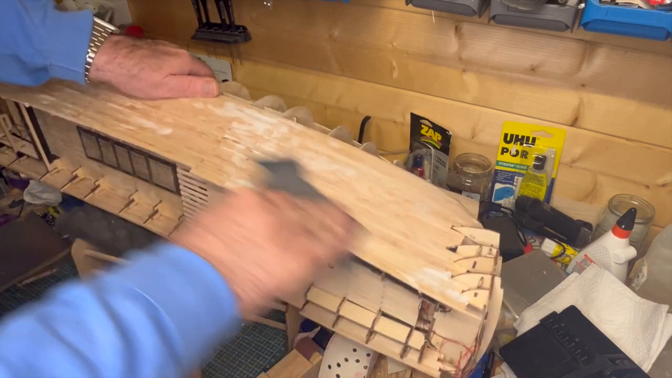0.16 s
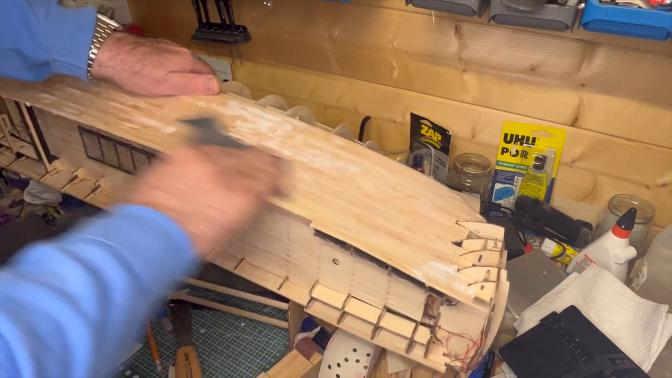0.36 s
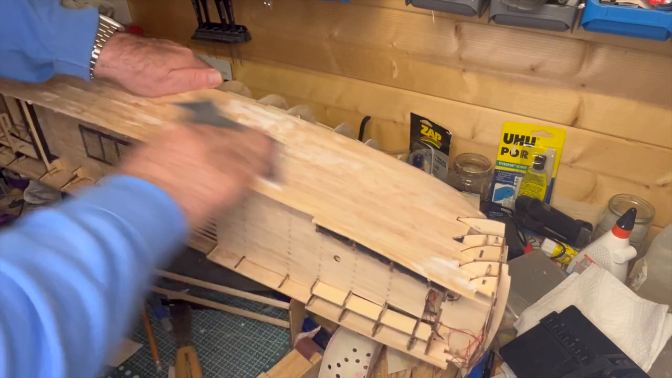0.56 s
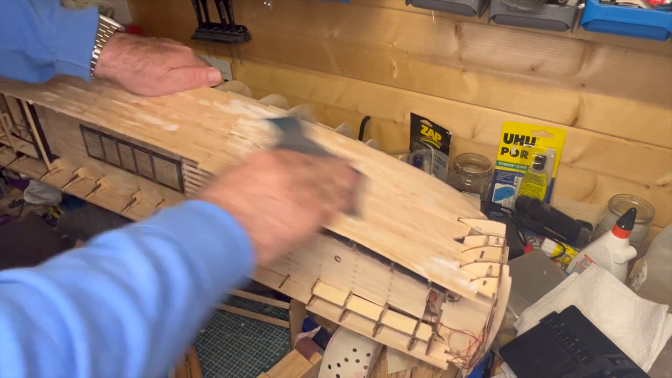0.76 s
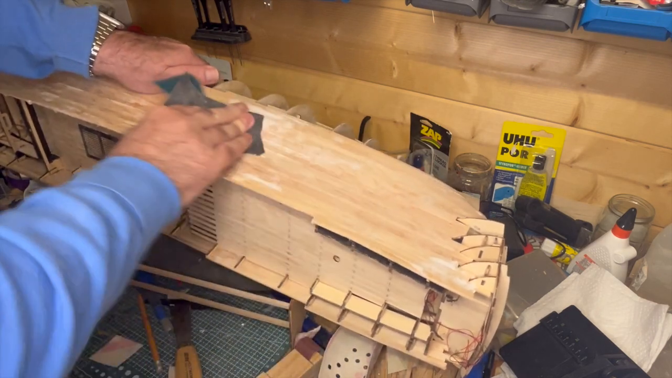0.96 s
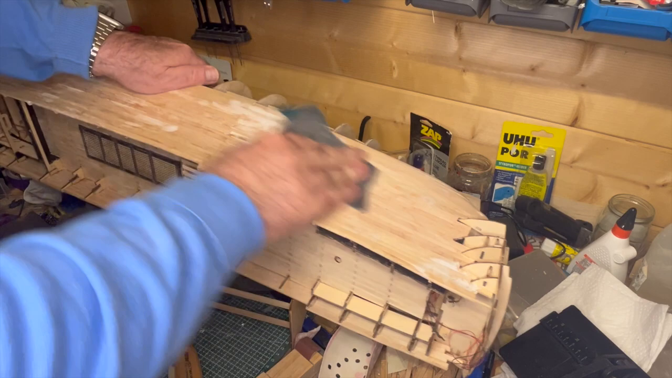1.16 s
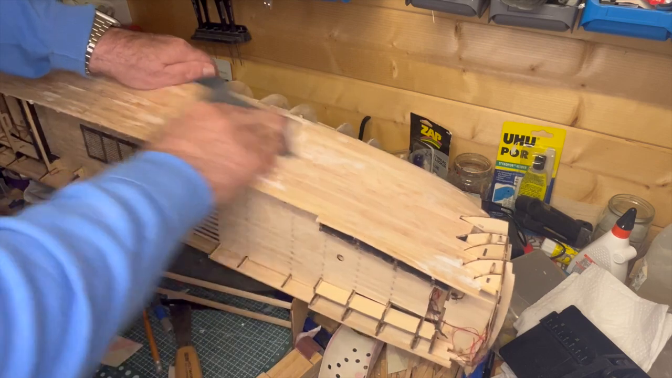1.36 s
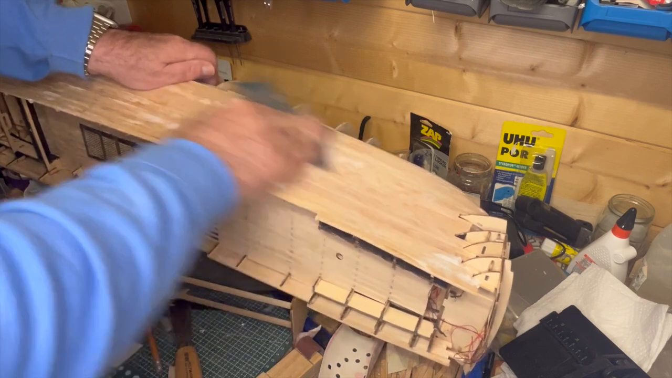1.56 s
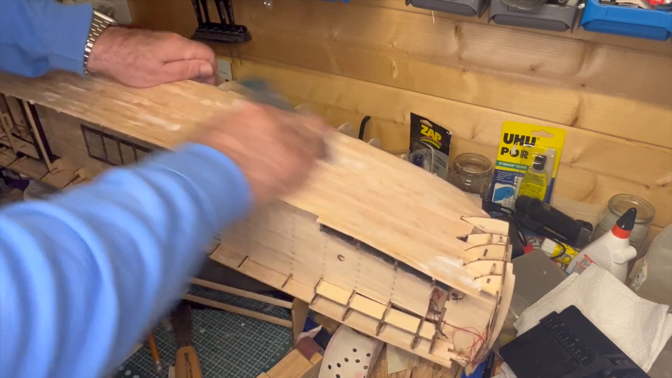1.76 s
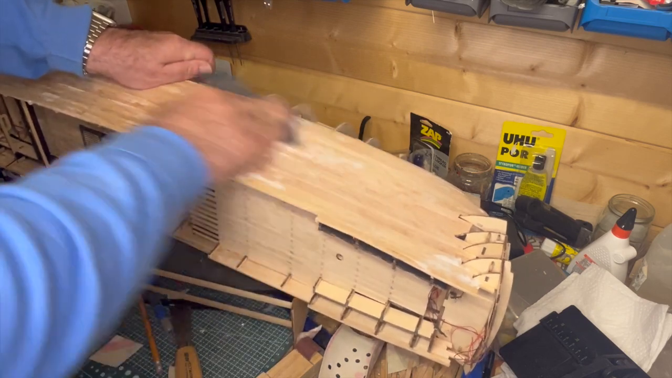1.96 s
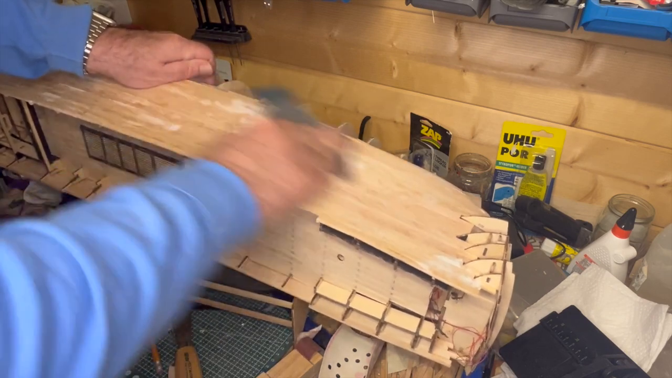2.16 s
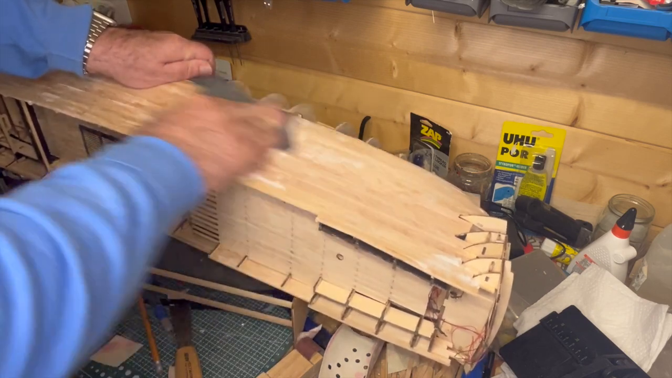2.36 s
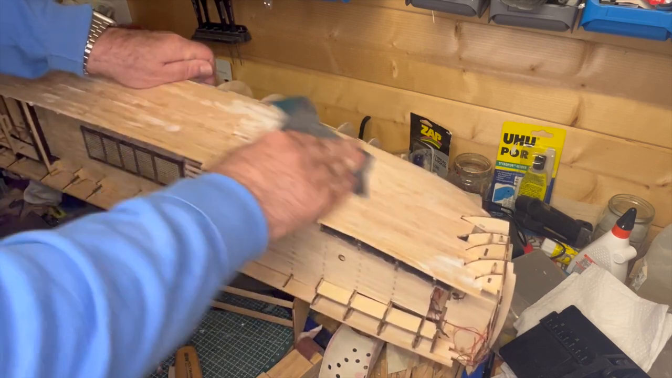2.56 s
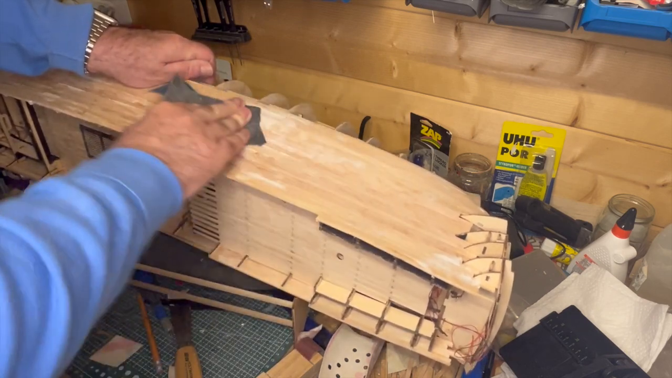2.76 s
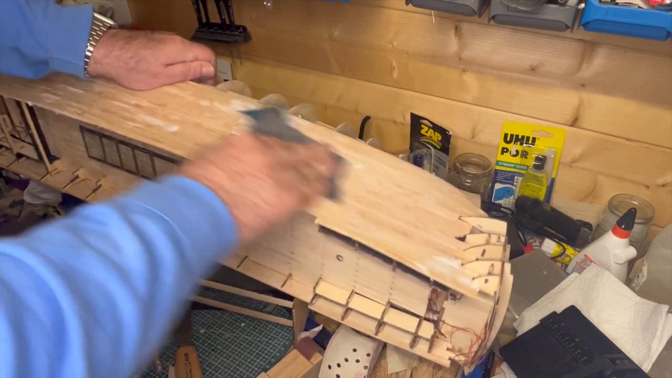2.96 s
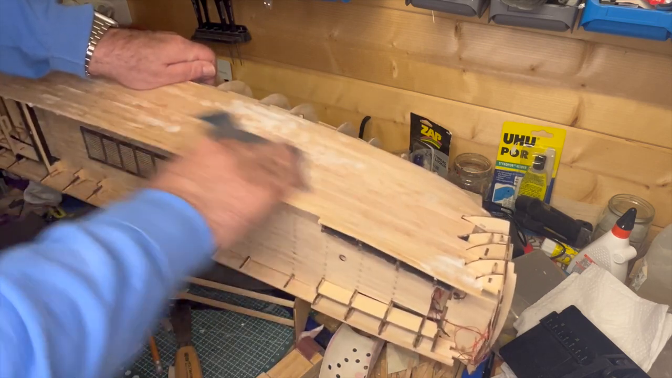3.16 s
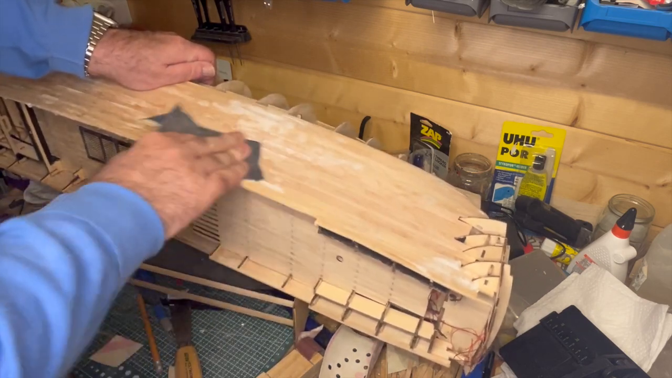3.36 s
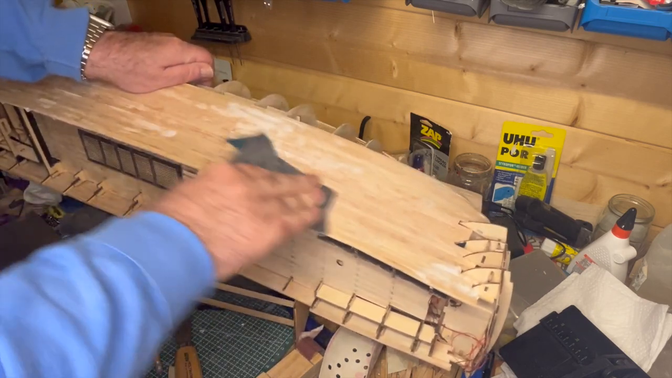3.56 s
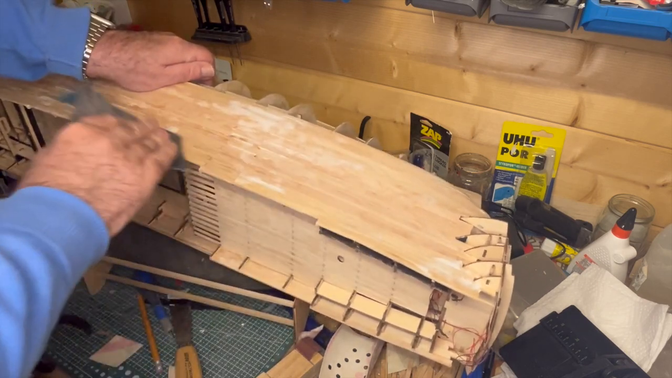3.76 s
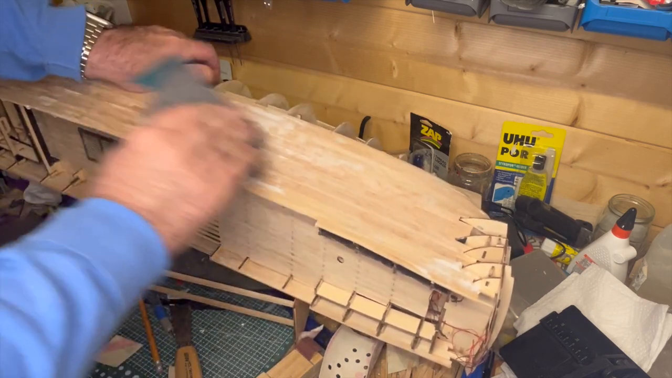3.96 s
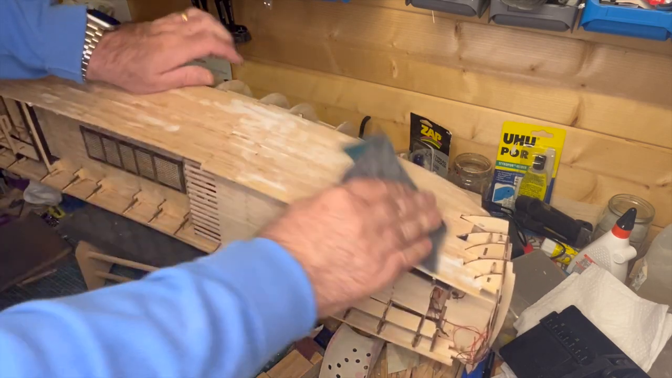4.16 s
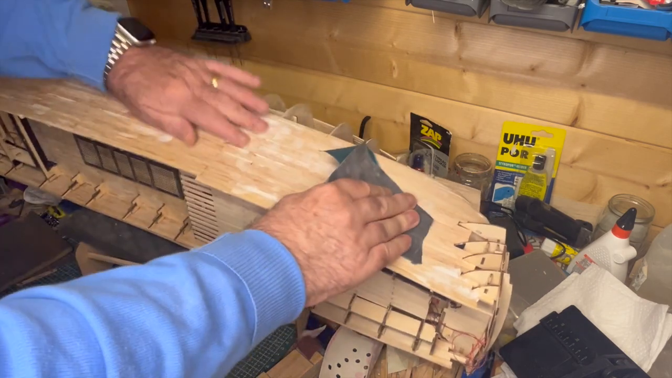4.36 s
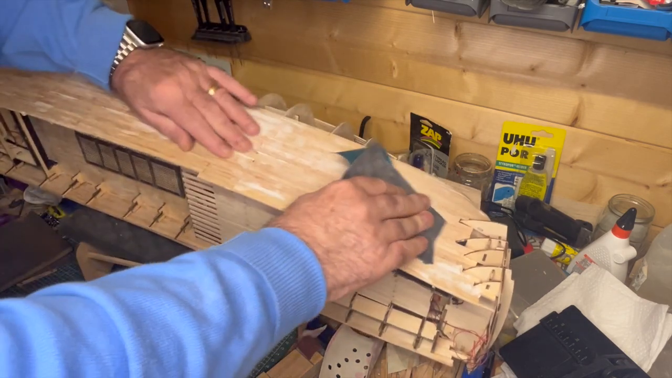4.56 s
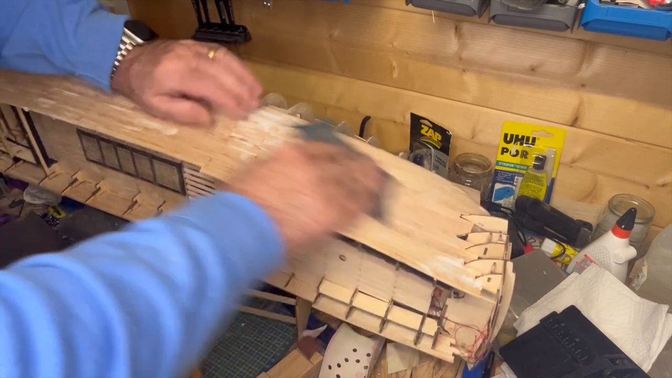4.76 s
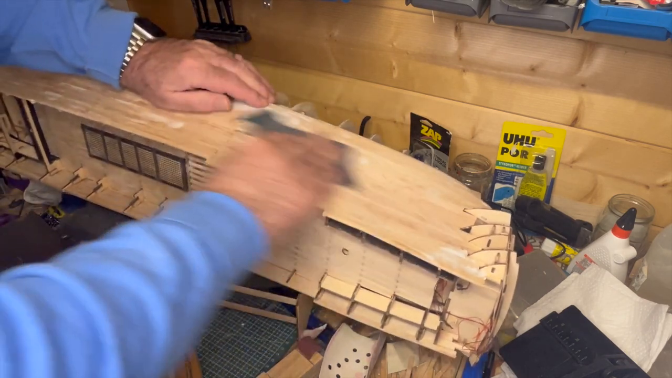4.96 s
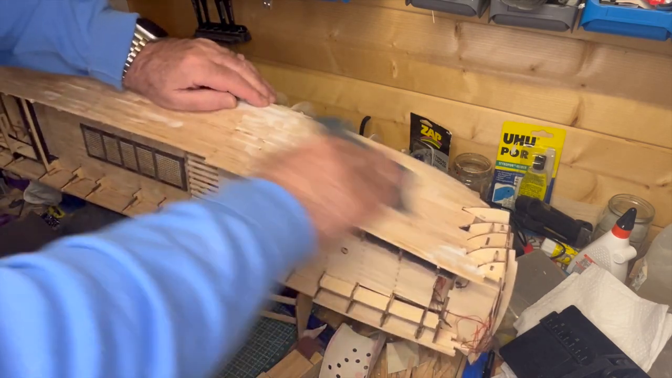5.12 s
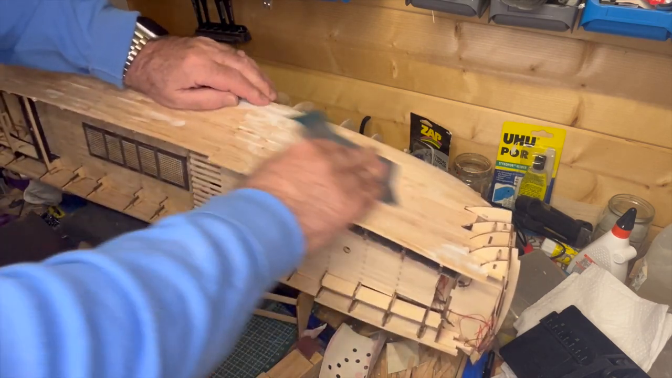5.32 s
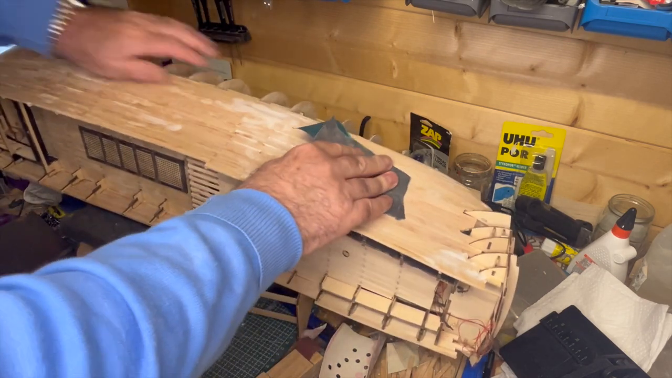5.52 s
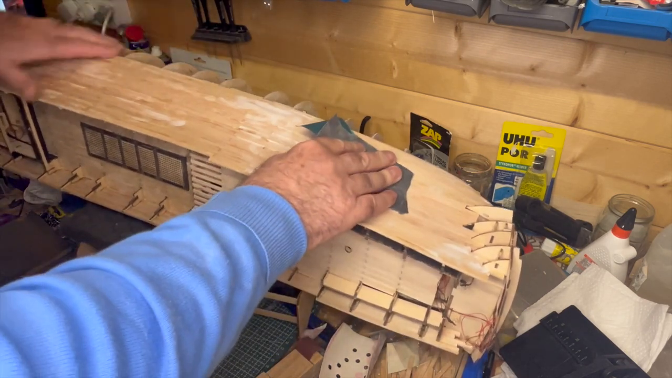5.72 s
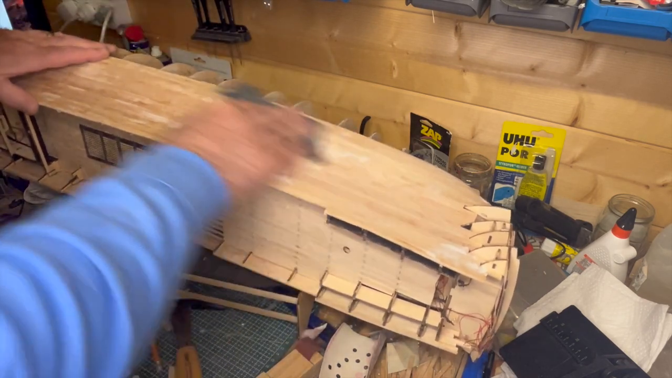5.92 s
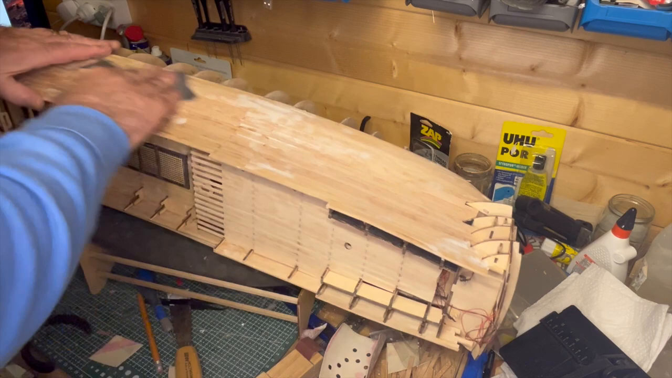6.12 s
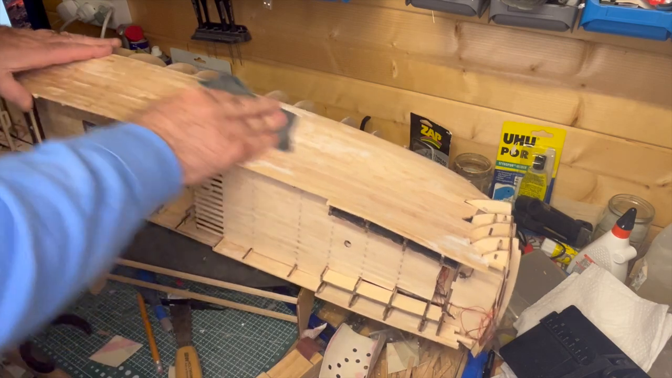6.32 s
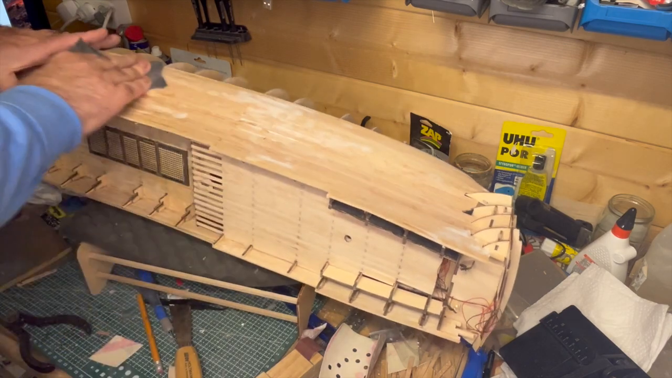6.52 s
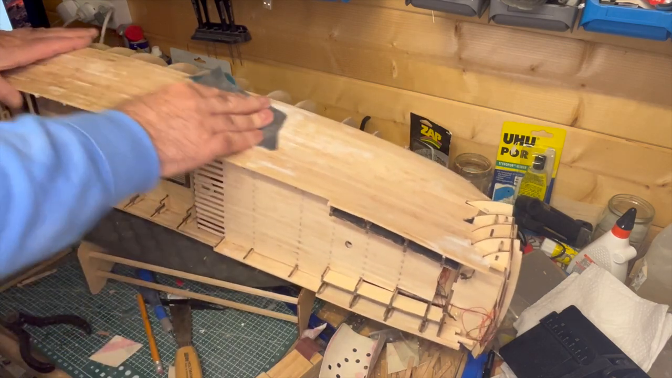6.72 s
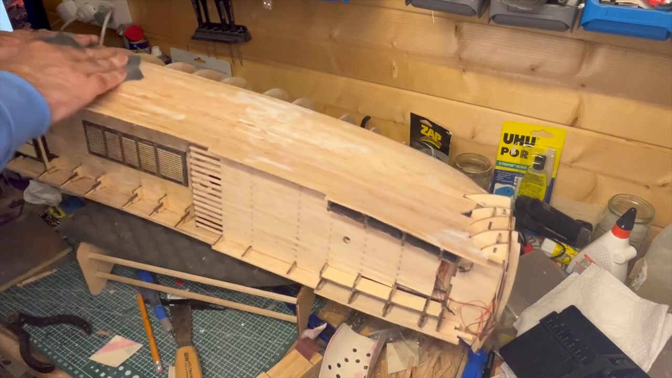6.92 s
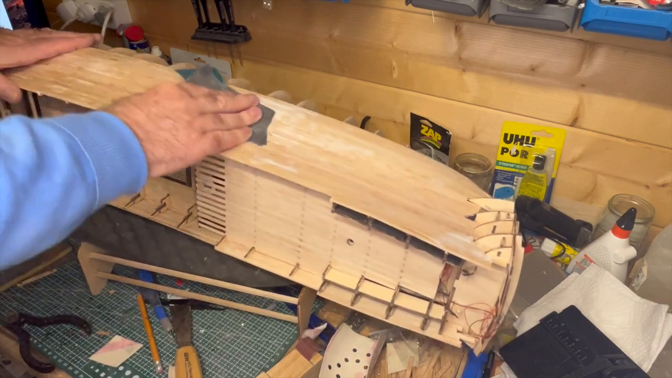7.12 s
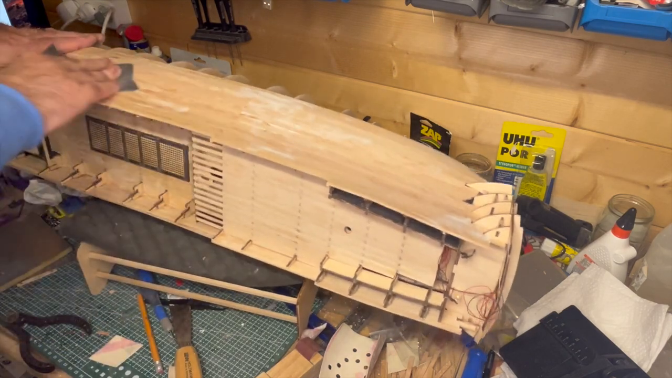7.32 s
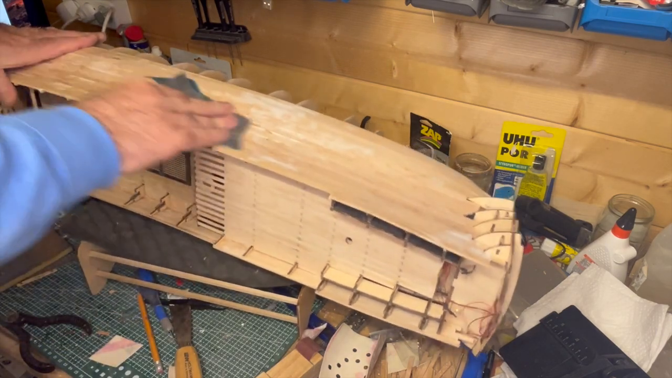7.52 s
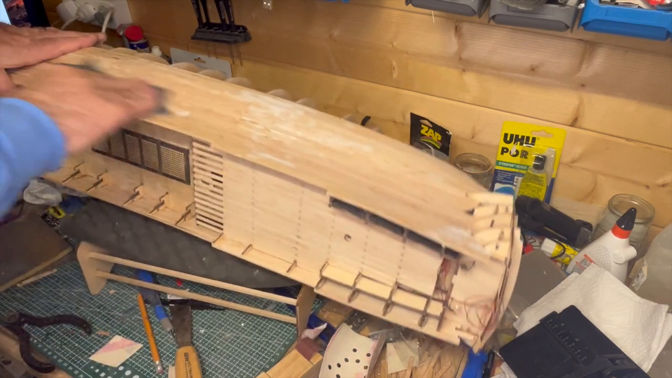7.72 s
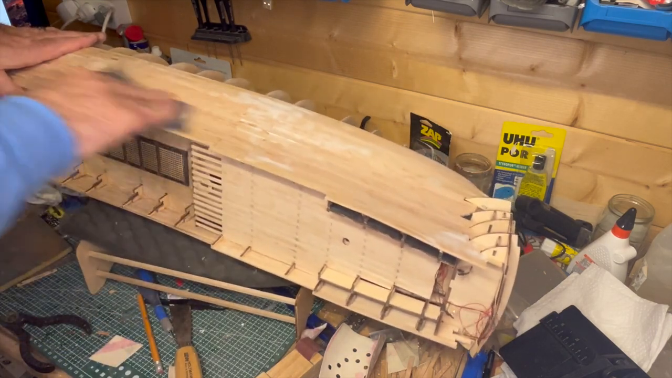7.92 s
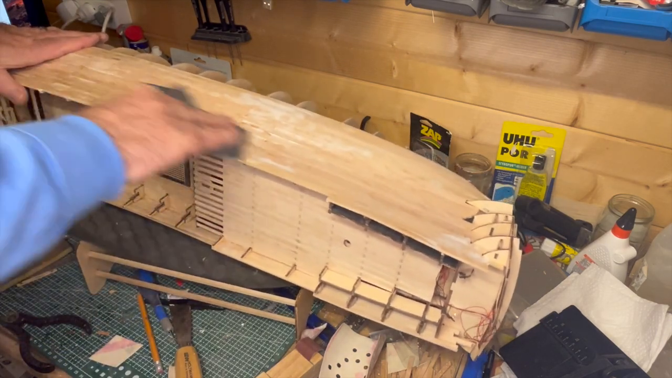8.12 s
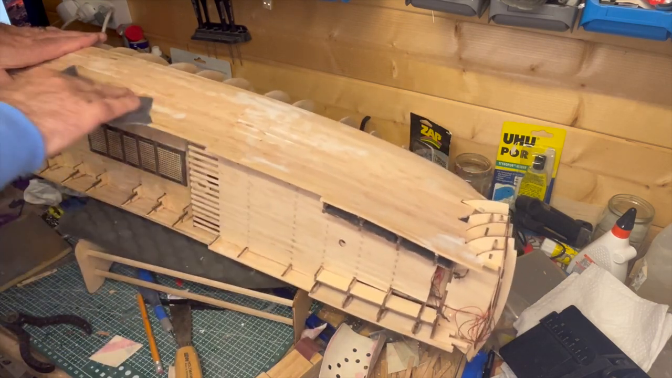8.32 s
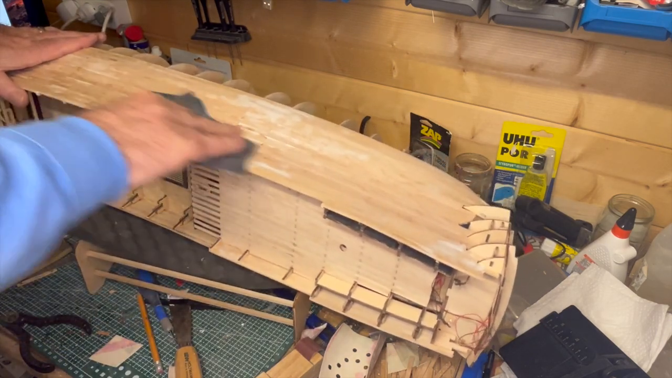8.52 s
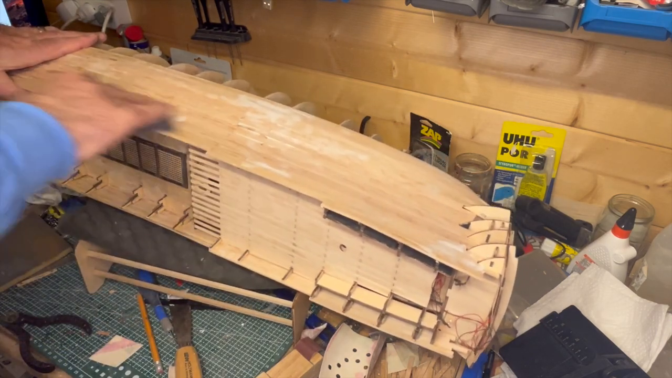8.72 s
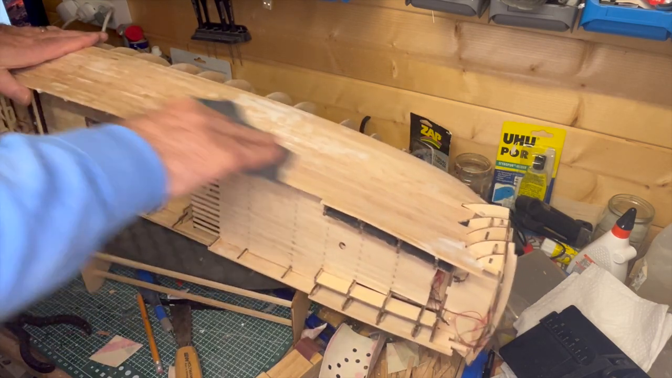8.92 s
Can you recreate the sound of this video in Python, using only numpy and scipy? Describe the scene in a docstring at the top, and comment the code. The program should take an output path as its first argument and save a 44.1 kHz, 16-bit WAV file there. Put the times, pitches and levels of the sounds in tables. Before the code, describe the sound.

Rapid hand sanding on thin wooden planks, heard very close and dry. Crisp, airy grit strokes alternate with tiny gaps at each turn, and edges catch with woody clicks. After a near-silent hesitation come a short burst and a second rest, then fuller, harder rasping with louder hollow knocks. Deep soft rumble from the rocking hull runs beneath, over faint background noise.

```python
"""Fine sandpaper is rubbed by hand back and forth along a hollow wooden hull, close to a mono microphone.
Quick strokes come first: grit hisses through the paper's resonances, hull modes murmur under it, planks sing
as narrow noise and the hull knocks where the paper catches an edge. Around 4 s the rubbing falters and a bare
hand slides as soft rasping noise; a few stronger strokes, another pause, then strong strokes lead to the end.
Throughout, the hull rocks on its stand with low rumble and thuds of filtered noise, over a faint background."""
import sys
import numpy as np
from scipy import signal
from scipy.fft import rfft, irfft, next_fast_len
from scipy.io import wavfile
from scipy.ndimage import uniform_filter1d, map_coordinates

SR = 44100
rng = np.random.default_rng(int(sys.argv[2]) if len(sys.argv) > 2 else 0)


def to_wav(sig):
    """Store sig (one row per channel, or 1-D mono) as 16-bit WAV at the path in sys.argv[1].

    Samples outside -1..1 are clipped; the rate is SR.
    """
    pcm = np.clip(np.atleast_2d(sig), -1, 1) * 32767
    pcm = np.round(pcm).astype(np.int16)
    wavfile.write(sys.argv[1], SR, pcm.T)  # frames by channels


def elevation(decibels):
    """Turn decibel levels (scalar or array-like) into linear amplitude ratios."""
    levels = np.asarray(decibels, float)
    return 10 ** (levels / 20)


N = 400428

# Modes of the hull. Each row: centre in Hz, nominal width in Hz, relative level in dB.
HULL_MODES = [(383.6, 94, -7.5), (549, 105, -5.5), (774, 94, -4.5), (943, 250, -2.5), (1170, 170, -5.5),
              (1446, 237, 4.5), (2332, 620, 2), (2800, 490, 1), (3282, 460, 2)]
# Colour of paper or hand rasping on wood. Each row: frequency in Hz, relative density in dB per Hz.
RASP_COLOUR = [(200, -39.5), (350, -11), (800, -7), (1500, -4.5), (2000, 4.5), (3200, -2), (4500, -24.5),
               (7000, -64)]


def unit(x):
    """Scaled to rms 1."""
    return x / np.sqrt(np.mean(x ** 2) + 1e-20)


def curves(rows):
    """One value per sample for each column after the time."""
    seconds, *columns = np.transpose(rows)
    return [np.interp(np.arange(N) / SR, seconds, column) for column in columns]


def wobble(rate):
    """A smooth random curve, rate knots a second (400 at most)."""
    knots = rng.standard_normal(int(N * 400 / SR) + 4)
    return map_coordinates(knots, [np.arange(N) * rate / SR])


def filtered(x, response):
    """x times a complex response of frequency."""
    m = next_fast_len(N + 8192)
    return irfft(rfft(x, m) * response(np.fft.rfftfreq(m, 1 / SR)), m)[:N]


def coloured(x, spectrum):
    """x given the colour of (Hz, dB) points, joined along log frequency, rms 1."""
    f, db = np.transpose(spectrum)
    return unit(filtered(x, lambda hz: elevation(np.interp(np.log(hz + 1), np.log(f + 1), db))))


def resonance(f, centre, width):
    """Complex response of one damped resonance, 1 at its centre."""
    return 1j * f * width / (centre ** 2 - f ** 2 + 1j * f * width)


def ringing(x, centre, width):
    """x through one resonance, centre and width in Hz."""
    return filtered(x, lambda f: resonance(f, centre, width))


def patchy(x, patchy_db, size):
    """x with drifting patches of random gain, size bands of 86 Hz wide and about 60 ms long."""
    z = signal.stft(x, nperseg=512)[2]
    field = uniform_filter1d(rng.standard_normal(z.shape), size=size, axis=0)
    field = uniform_filter1d(field, size=10, axis=1)
    return signal.istft(z * elevation(patchy_db * unit(field)), nperseg=512)[1][:N]


def grit(spread_db, clump_db):
    """Dense grains biting at uneven sizes, in clumps a few milliseconds long that thicken and thin slowly."""
    sizes = np.minimum(rng.exponential(size=N), 3)
    grains = rng.standard_normal(N) * elevation(spread_db * sizes)
    return unit(grains * elevation(clump_db * wobble(350) + 0.81 * clump_db * wobble(60)))


def background():
    """A faint steady noise floor."""
    # Each row: frequency in Hz, relative density in dB per Hz.
    floor_colour = [(35, -33.5), (60, -2), (249, -24), (322, -15.5), (1030, -24.5), (2080, -30.5),
                    (5800, -33), (15400, -28), (16000, -91)]
    return elevation(-93.5) * coloured(rng.standard_normal(N), floor_colour)


def stand():
    """The hull rocks on its stand: a deep, uneven rumble with lumpy thuds at each jolt."""
    # Steady rocking, stilled while the hand rests. Each row: time in seconds, rumble level in dB.
    sway = [(0, -58.5), (0.7, -60), (1.9, -61.5), (3.2, -58), (3.9, -63), (4.2, -74), (4.35, -68),
            (4.62, -84), (4.8, -59.5), (5.3, -60), (5.8, -73), (6.0, -60.5), (7.0, -58.5), (9.08, -63)]
    # Jolts of the stand. Each row: middle in seconds, seconds from there to 44 dB down, thud level in dB.
    jolt_rows = [(0.04, .05, -60), (0.193, .05, -56), (0.43, .06, -60), (0.57, .06, -59), (0.95, .16, -57),
                 (1.252, .08, -57), (1.442, .05, -64), (1.988, .11, -56), (2.4, .15, -69),
                 (2.773, .14, -66), (3.042, .06, -54), (3.163, .08, -53), (3.52, .12, -68),
                 (3.928, .1, -72), (4.3, .07, -71), (4.884, .08, -78), (5.14, .1, -63), (6.037, .09, -67),
                 (6.74, .14, -64), (7.202, .11, -53), (7.504, .09, -67), (7.713, .05, -59),
                 (7.884, .06, -63), (8.448, .08, -59), (8.535, .07, -54), (8.723, .08, -54.5),
                 (9.0, .05, -69)]
    # Colours of rumble and thud. Each row: frequency in Hz, relative density in dB per Hz.
    rumble_colour = [(6, -25.5), (12, 5), (25, 5.5), (45, -19), (70, -16.5), (110, -36.5), (200, -120)]
    thud_colour = [(41, -38), (70, 7.5), (102, -0.5), (129, -5), (216, -6), (280, -12.5), (360, -39.5),
                   (620, -120)]
    sway_thud_db = -18  # thud against the steady rumble
    jolt_rumble_db = 5  # rumble of a jolt against its thud

    t, (sway_db,) = np.arange(N) / SR, curves(sway)
    jolts = sum(elevation(db - 44 * ((t - s) / length) ** 2) for s, length, db in jolt_rows)
    thud_level = (elevation(sway_db + sway_thud_db) + jolts) * elevation(0.83 * wobble(27))
    rumble_level = (elevation(sway_db) + elevation(jolt_rumble_db) * jolts) * elevation(1.1 * wobble(2.6))
    thud = thud_level * coloured(rng.standard_normal(N), thud_colour)
    rumble = rumble_level * coloured(rng.standard_normal(N), rumble_colour)
    return rumble + thud


def sliding():
    """The bare hand rasps softly over the planks: flat-topped swells of coloured grit."""
    # Each row: middle in seconds, length in seconds between the points 30 dB down, level in dB.
    slides = [(3.906, .2, -82.5), (4.35, 0.15, -86), (5.466, 0.07, -86.5), (5.79, 0.11, -77)]
    t = np.arange(N) / SR
    rub = sum(elevation(db - 30 * ((t - s) / (length / 2)) ** 4) for s, length, db in slides)
    rasp = rub * coloured(grit(spread_db=2.5, clump_db=1.5), RASP_COLOUR)
    return patchy(rasp, patchy_db=5, size=2)


def singing():
    """Planks and paper sing under a stroke or a hand: noise through one resonance, swelling and fading."""
    # Each row: middle in seconds, seconds from there to 38 dB down, pitch in Hz, width in Hz, level in dB.
    songs = [(0.078, 0.051, 1130, 97, -50), (0.263, 0.035, 2800, 230, -51), (0.38, 0.027, 2650, 250, -49.5),
             (0.582, 0.076, 2430, 300, -50.5), (0.74, 0.087, 2120, 380, -46.5),
             (1.28, 0.073, 816, 150, -56), (1.26, 0.043, 1640, 247, -42), (1.368, 0.037, 433, 59, -48),
             (2.31, 0.041, 447, 170, -59), (2.408, 0.029, 2700, 200, -64), (2.86, 0.12, 2100, 390, -50),
             (3.058, 0.064, 2480, 380, -45), (3.176, 0.13, 2260, 200, -53.5),
             (3.329, 0.091, 2350, 240, -46), (3.53, 0.082, 2320, 200, -63), (3.716, 0.096, 2680, 296, -45),
             (3.783, 0.04, 1090, 150, -50.5), (3.921, 0.14, 3250, 402, -84.5),
             (3.926, 0.13, 557, 216, -76.5), (4.2, 0.069, 1150, 200, -71), (4.375, 0.081, 990, 299, -75),
             (5.463, .09, 630, 410, -61.5), (5.788, 0.08, 1400, 493, -68), (0.934, 0.026, 1420, 220, -39.5),
             (1.38, 0.13, 760, 170, -61), (1.74, 0.12, 600, 210, -56.5), (8.1, 0.076, 1034, 150, -78),
             (8.392, 0.064, 1090, 150, -58.5), (8.246, 0.12, 1350, 130, -59),
             (4.36, 0.13, 2000, 202, -83.5), (3.71, 0.092, 4900, 500, -45), (2.373, 0.07, 4200, 300, -52),
             (0.2, 0.12, 4000, 270, -52.5), (0.74, 0.1, 4100, 320, -45.5), (8.45, 0.081, 4200, 390, -46),
             (8.61, 0.083, 4250, 400, -50), (8.84, 0.091, 4000, 270, -49.5), (8.0, 0.35, 2400, 190, -57),
             (2.72, 0.13, 524, 270, -52.5), (3.2, 0.43, 520, 200, -58), (2.156, .09, 1550, 200, -59),
             (2.517, 0.084, 1510, 140, -52.5), (2.877, .08, 1660, 240, -49), (7.768, 0.096, 790, 200, -49),
             (4.25, 0.048, 3830, 500, -63), (4.37, 0.082, 4610, 900, -81), (4.58, 0.076, 3400, 303, -72),
             (4.579, 0.082, 1680, 250, -84), (4.876, 0.07, 293, 130, -55), (8.13, 0.077, 2960, 296, -49.5),
             (8.254, 0.13, 2500, 210, -48.5), (5.761, 0.033, 584, 80, -69), (8.87, 0.032, 2090, 327, -35),
             (8.871, 0.036, 1090, 100, -43.5), (9.005, 0.06, 2160, 220, -50)]
    sound = np.zeros(N + SR)  # starts 0.25 s early, to hold the swell before each middle
    t, lag = np.arange(-SR // 4, SR // 4) / SR, np.arange(SR // 20) / SR
    for s, length, hz, width, db in songs:
        plank = lag * np.exp(-np.pi * width * lag) * np.sin(2 * np.pi * hz * lag)
        band = unit(signal.fftconvolve(rng.standard_normal(len(t)), plank)[:len(t)])
        swell = elevation(db - 38 * (t / length) ** 2)
        sound[round(s * SR):][:len(t)] += swell * band
    return sound[SR // 4:][:N]


def knocks():
    """Each catch scuffs the hull, most near the pitch of the plank struck, and cracks for some milliseconds."""
    # Each row: start in seconds, nominal hull level in dB, nominal crack level against it in dB,
    # pitch of the plank struck in Hz, seconds in which the drag after the blow falls by 60 dB.
    blows = [(0.319, -33, -16, 567, 0.22), (0.379, -26, -19, 820, 0.15), (0.93, -26.5, 2.5, 900, 0.14),
             (1.238, -45.5, -8, 1520, 0.37), (1.352, -55, -5, 441, 0.072), (1.988, -38, -8, 1390, 0.34),
             (2.024, -23, 4, 1550, 0.089), (2.66, -43, -12, 571, 0.19), (2.995, -28, -21, 455, 0.43),
             (4.097, -58.5, -22, 388, 0.12), (5.087, -28.5, -9, 950, 0.093), (5.192, -19.5, 7.5, 910, 0.11),
             (5.432, -48.5, -29, 729, 0.12), (5.739, -62, -18.5, 570, 0.11), (6.339, -29, -6, 766, 0.17),
             (6.762, -16, -18, 624, 0.25), (6.93, -7.5, -2, 1170, 0.098), (7.694, -14.5, -32, 770, 0.12),
             (8.438, -25.5, -8, 610, 0.15), (8.854, -29.5, 7.5, 980, 0.19)]
    # Each row: frequency in Hz, relative density in dB per Hz.
    crack_colour = [(1500, -50.5), (3000, 1), (5500, 6), (7500, 9.5), (11000, 3), (15000, -8),
                    (16200, -24.5), (16600, -96)]

    t = np.arange(SR // 4) / SR
    wood, crack_level = np.zeros(N + SR), np.zeros(N + SR)
    for s, db, crack_db, plank_hz, drag in blows:
        ring = np.zeros(len(t))
        for hz, width, mode_db in HULL_MODES:
            strength_db = mode_db + rng.normal(0, 3) - 16.0 * np.log2(hz / plank_hz) ** 2
            struck_hz = hz * (1 + rng.normal(0, 0.02))  # each blow detunes the modes slightly
            decay = np.exp(-np.pi * 0.55 * width * t)
            ring += elevation(strength_db) * decay * np.sin(2 * np.pi * struck_hz * t)
        scuff = elevation(-26 - 60 * t / drag) * rng.standard_normal(len(t))  # the paper drags on after the blow
        scuff[0] = np.clip(0.06 / drag, 0, 1)  # the blow itself: a long drag starts with a softer one
        body = signal.fftconvolve(ring, scuff)[:len(t)] * (1 - np.exp(-t / 0.001))
        snap = elevation(-60 * t / 0.03) * (1 - np.exp(-t / 0.0021))
        at = round(s * SR)
        wood[at:][:len(t)] += elevation(db - 6.5) * body
        crack_level[at:][:len(t)] += elevation(db + crack_db + 3.5) * snap
    # the light hull radiates no bass
    no_bass = signal.butter(2, 330, "high", fs=SR, output="sos")
    wood = signal.sosfilt(no_bass, wood[:N])
    return wood + crack_level[:N] * coloured(grit(spread_db=4, clump_db=1), crack_colour)


def stroke_levels():
    """Hiss level in dB, and its peak: the hand speeds up from a turn and brakes into the next."""
    # Each row: turn of the hand in seconds, hiss there in dB, fastest moment in seconds, hiss there in dB,
    # fullness of the rise (an exponent).
    strokes = [(0.0, -38.5, 0.083, -32, 3.8), (0.117, -70.5, 0.263, -37, 3.3),
               (0.306, -77.5, 0.416, -36.5, 1.48), (0.468, -69, 0.571, -35, 1.28),
               (0.639, -72, 0.729, -29.5, 1.25), (0.811, -65, 0.917, -24, 1.31),
               (0.978, -66.5, 1.065, -30, 1.3), (1.145, -70.5, 1.222, -26.5, 0.73),
               (1.321, -68.5, 1.392, -32, 1.9), (1.489, -76, 1.6, -30.5, 1.2),
               (1.676, -74.5, 1.761, -37.5, 1.28), (1.858, -71, 1.99, -26, 0.82),
               (2.068, -55.5, 2.13, -36.5, 0.95), (2.243, -74, 2.381, -32.5, 1.18),
               (2.437, -76, 2.537, -37, 2.6), (2.596, -72.5, 2.7, -31.5, 0.87),
               (2.776, -66.5, 2.886, -33, 1.84), (2.93, -73.5, 3.042, -32, 1.3),
               (3.095, -68.5, 3.198, -35.5, 4.8), (3.243, -80, 3.347, -35.5, 1.44),
               (3.4, -82.5, 3.52, -44.5, 4.9), (3.551, -73.5, 3.715, -34.5, 1.1),
               (3.829, -91.5, 4.13, -105, 2.6), (4.18, -101, 4.272, -55, 1.54),
               (4.48, -105, 4.585, -76, 1.07), (4.677, -121.5, 4.855, -27.5, 5.07),
               (4.901, -50, 4.945, -28, 1.05), (5.08, -50, 5.199, -30, 6.6), (5.245, -61.5, 5.35, -33, 5.2),
               (5.456, -92, 5.621, -101, 0.7), (5.816, -89.5, 6.02, -24, 3.54),
               (6.109, -54, 6.157, -25.5, 1.7), (6.306, -65.5, 6.477, -25.5, 5.3),
               (6.528, -53.5, 6.566, -25.5, 0.83), (6.731, -60.5, 6.836, -26.5, 2.4),
               (6.954, -41.5, 7.072, -28, 8), (7.152, -67, 7.291, -25, 4.16), (7.337, -50, 7.462, -24, 5.5),
               (7.524, -65, 7.601, -22.5, 2.06), (7.697, -69, 7.797, -24, 3.85),
               (7.859, -61, 7.937, -25, 2.9), (8.016, -72, 8.147, -27.5, 4.8),
               (8.181, -56.5, 8.234, -27.5, 1.2), (8.348, -76, 8.478, -32.5, 2.74),
               (8.525, -63, 8.596, -32.5, 1.55), (8.694, -73, 8.869, -28, 1.38),
               (8.913, -70, 8.99, -37.5, 1.17), (9.08, -84, 9.2, -53, 2)]
    # Seconds within strokes that end with the paper lifting away, or snagging.
    lifts = [3.7, 4.3, 5.4]
    catches = [.93, 2.0, 8.88]
    brake_s, dwell_s = 0.021, 0.0038  # nominal braking time; rest on each side of a turn

    turn, turn_db, top, top_db, rise = np.transpose(strokes)
    # the hand keeps its speed until it brakes, so a longer fall is fuller
    fall = np.maximum((turn[1:] - top[:-1]) / brake_s, 1)
    # lifted and snagged strokes fade without holding their speed
    fall[np.searchsorted(turn, lifts) - 1] = 0.84
    fall[np.searchsorted(turn, catches) - 1] = 1.42
    t = np.arange(N) / SR
    k = np.clip(np.searchsorted(turn, t, "right") - 1, 0, len(turn) - 2)  # stroke under way
    up = np.clip((top[k] - t) / (top[k] - turn[k] - dwell_s), 0, 1) ** rise[k]
    down = np.clip((t - top[k]) / (turn[k + 1] - dwell_s - top[k]), 0, 1) ** fall[k]
    level = top_db[k] + (turn_db[k] - top_db[k]) * up + (turn_db[k + 1] - top_db[k]) * down
    return level, np.maximum(level, np.interp(t, top, top_db))


def planking():
    """The rubbing drives the hull's modes, each swelling on its own, over a broad rasp; all sink as it slows."""
    # Murmur under a stroke of -30 dB, as the paper wanders along the hull.
    # Each row: time in seconds, nominal level of the deep modes in dB, of the upper modes in dB.
    murmur = [(0.04, -53, -51.5), (0.34, -42.5, -45.5), (0.55, -60, -53.5), (1.25, -75, -59.5),
              (1.7, -46, -52.5), (1.85, -57.5, -58), (2.55, -60, -60), (2.7, -43.5, -52.5),
              (2.92, -49, -54), (3.05, -50, -59.5), (3.33, -45, -61), (3.5, -59, -61.5), (3.76, -47, -50.5),
              (4.3, -59, -47.5), (4.75, -77, -53), (5.3, -62, -48.5), (5.9, -56, -50.5), (6.6, -41, -45.5),
              (7.45, -43, -42), (7.9, -53.5, -50), (8.3, -58.5, -60), (8.5, -51.5, -56.5),
              (9.05, -55.5, -62)]
    # Rasp of the paper pressed flat, under a stroke of -30 dB. Each row: time in seconds, level in dB.
    rasp_levels = [(0, -63), (3.7, -67.5), (4.3, -54.5), (4.7, -56), (5.4, -48.5), (5.9, -43), (6.9, -51.5),
                   (7.5, -54), (7.75, -82), (9.08, -79)]
    # Top modes against the other upper ones. Each row: time in seconds, level in dB.
    top_levels = [(0, 4), (0.4, -3), (0.7, 3.5), (1.6, -5), (2.1, 2), (2.5, -2.5), (3.1, 7), (3.7, 0.5),
                  (4.8, 4), (5.4, -5), (6.2, 0), (7.4, 3), (7.7, 4.5), (8.3, 10), (8.6, 5), (9.08, 2.5)]
    split_hz, top_hz = 660, 1900  # upper modes start at the first, top modes above the second
    deep_follows, upper_follows = 0.27, 0.56  # dB of murmur per dB of hiss
    contact_db = -87  # below this hiss the paper is off the wood and the murmur dies

    level = stroke_levels()[0]
    drive, lifted = level + 30, np.minimum(level - contact_db, 0)
    (deep_db, upper_db), (rasp_db,), (top_db,) = curves(murmur), curves(rasp_levels), curves(top_levels)
    rasp = coloured(grit(spread_db=2.5, clump_db=1.5), RASP_COLOUR)
    sound = elevation(rasp_db + 0.5 * drive + 1.5 * wobble(30)) * rasp
    for hz, width, db in HULL_MODES:
        band = ringing(rng.standard_normal(N), hz, width)
        band = ringing(band, hz, 2.4 * width)  # steeper skirts
        swell = 2.86 * wobble(6) + 1.78 * wobble(50)
        if hz < split_hz:
            body = deep_db + deep_follows * drive
        else:
            body = upper_db + upper_follows * drive
        if hz > top_hz:
            body = body + top_db
        sound += elevation(body + db - 10.0 + swell) * unit(band)
    return patchy(elevation(lifted) * sound, patchy_db=3.5, size=2)  # thin strips answer unevenly


def sandpaper():
    """Grit hiss; slow motion sounds duller, as the paper's resonances sink less than the top."""
    # Finest grit. Each row: frequency in Hz, relative density in dB per Hz.
    hiss_colour = [(2000, -51.5), (3200, -44), (5000, -17), (7500, -7), (9800, -4), (12000, 1.5),
                   (14300, -1), (15400, -8), (15900, -32.5), (16300, -57.5)]
    # Paper resonances under the fingers. Each row: centre in Hz, width in Hz of each of two passes,
    # share of the stroke's swing in level from 0 to 1, level in dB.
    paper_modes = [(4105, 1000, 0.81, -5.5), (5416, 1000, 0.91, -4), (6370, 1400, 0.93, -4),
                   (8550, 1100, 0.87, -3)]
    # Resonances against the top hiss. Each row: time in seconds, lowest pair in dB, main in dB, high in dB.
    grip = [(0.08, -10.5, -4, -24), (0.41, -11.5, 3.5, -23), (0.6, -4, -1.5, 2.5), (1.0, -12, -4, -22),
            (1.7, -18, -6.5, -24), (2.2, -20, -2, -4.5), (2.7, -17, -6.5, -11.5), (3.3, -8.5, -2, 4),
            (3.52, -14.5, -4, 1.5), (3.71, -12.5, -6.5, 7), (4.27, 1.5, 6.5, -18.5), (4.62, -5, 13.5, -6),
            (4.86, -7.5, -6.5, -19.5), (5.3, -6.5, 3, -27), (6.0, -13, 0, -17.5), (7.0, -9.5, 0, -6.5),
            (7.6, -10.5, 0, -4), (8.15, -10, -12.5, -4.5), (8.6, -19, -18, -4), (8.9, -11.5, 2, -11)]
    # Second resonance against the lowest. Each row: time in seconds, level in dB.
    second = [(0, -4.5), (1.0, -7.5), (1.5, -13.5), (2.1, 5), (2.5, -2), (3.3, 7.5), (4.3, -3.5), (6.0, 4),
              (8.2, 4), (8.6, 8.5), (9.0, -5)]

    level, peak = stroke_levels()
    chatter = 1.2 * wobble(40)  # uneven planks under the whole sheet
    sound = elevation(level + chatter) * coloured(grit(spread_db=1.0, clump_db=0.5), hiss_colour)
    (low_db, main_db, high_db), (second_db,) = curves(grip), curves(second)
    grips = [low_db, low_db + second_db, main_db, high_db]
    for (hz, width, swing, db), grip_db in zip(paper_modes, grips):
        band = ringing(grit(spread_db=4.0, clump_db=1), hz, width)
        band = ringing(band, hz, width)
        grip_db = grip_db + 2.6 * wobble(5.5)  # each resonance's level wanders slowly at random
        motion_db = peak + swing * (level - peak)
        sound += elevation(motion_db + grip_db + db + chatter) * unit(band)
    return patchy(sound, patchy_db=2.5, size=5)  # the sheet bends, so its colour drifts


def bench_echo(work):
    """The bench's echo cancels part of one band: a share of a resonance is taken away."""
    return work - 0.6 * ringing(work, centre=1920, width=400)


def scene():
    """All sources over a faint background, alike in both channels."""
    work = sandpaper() + planking() + singing() + knocks() + sliding()
    mix = bench_echo(work) + stand() + background()
    return np.tile(mix, (2, 1))


def top_cut(x):
    """Nothing passes above the cut-off."""
    return signal.sosfilt(signal.butter(12, 16480, fs=SR, output="sos"), x)


def record(dry):
    """The finished mix as it is delivered."""
    return top_cut(dry)


dry = scene()
out = record(dry)
to_wav(out)
```